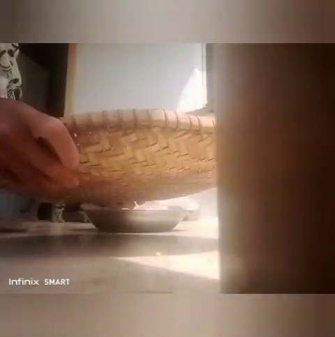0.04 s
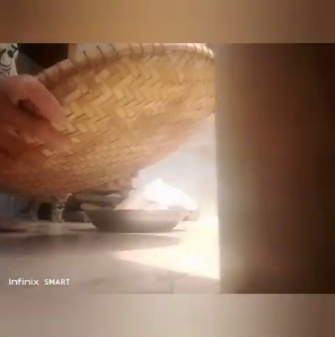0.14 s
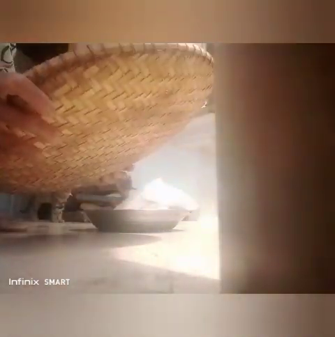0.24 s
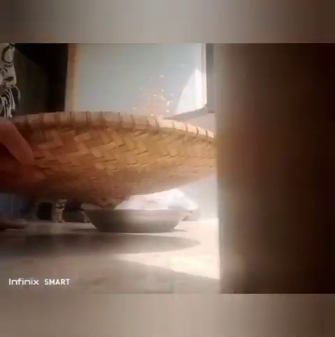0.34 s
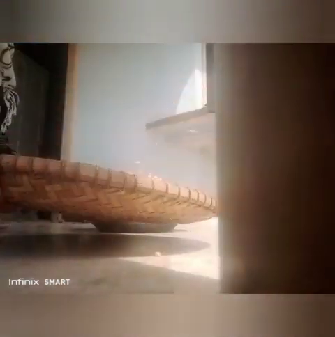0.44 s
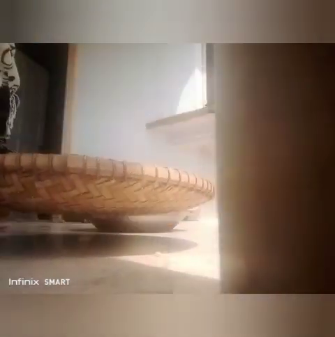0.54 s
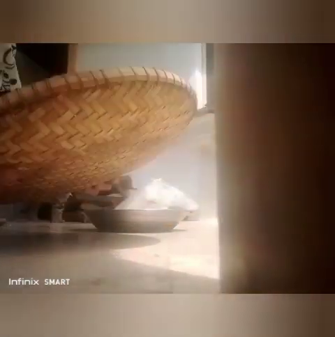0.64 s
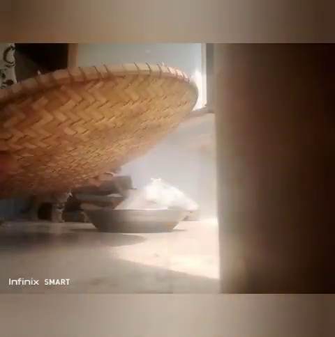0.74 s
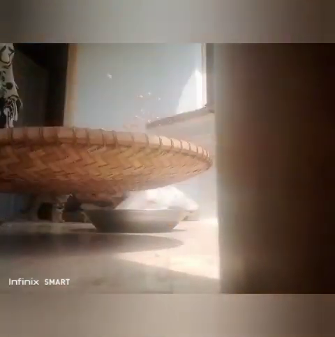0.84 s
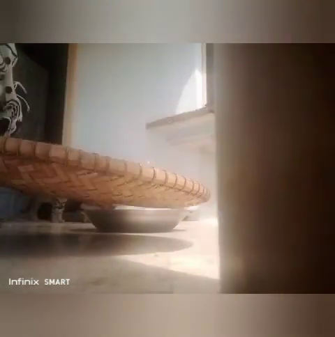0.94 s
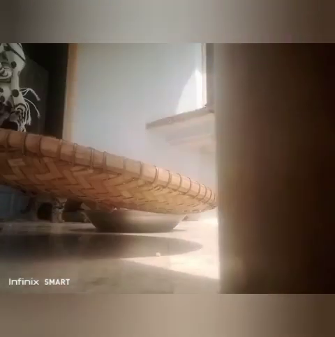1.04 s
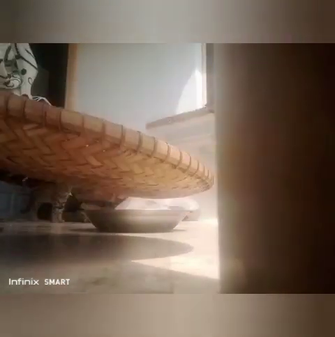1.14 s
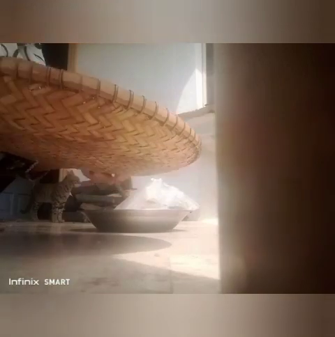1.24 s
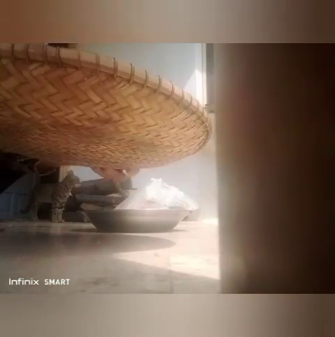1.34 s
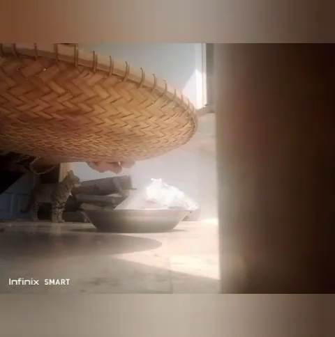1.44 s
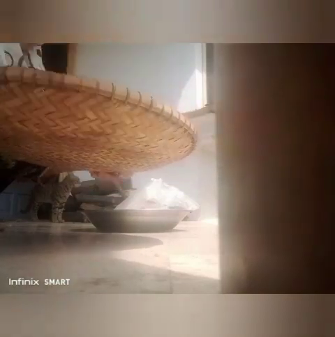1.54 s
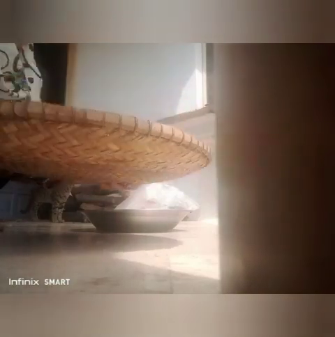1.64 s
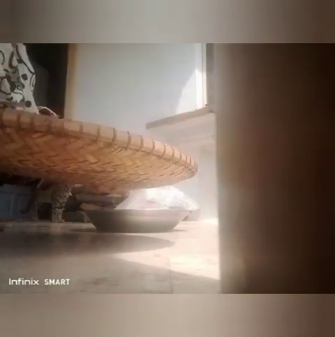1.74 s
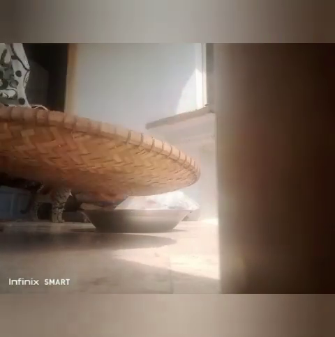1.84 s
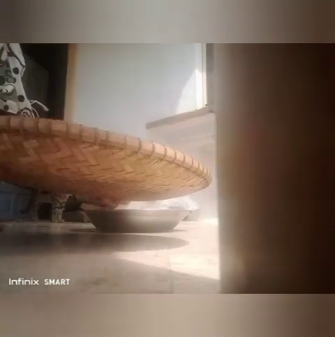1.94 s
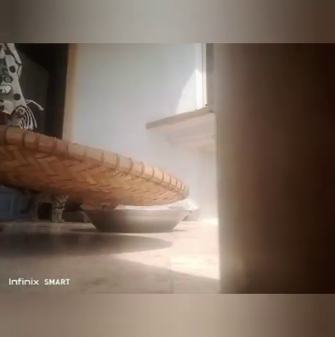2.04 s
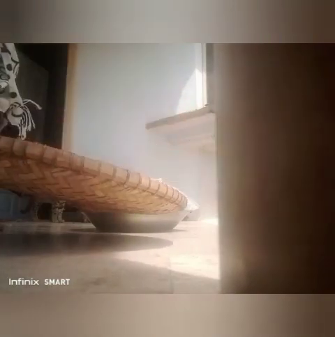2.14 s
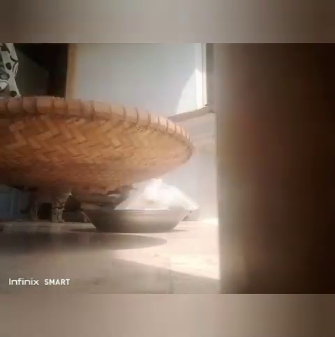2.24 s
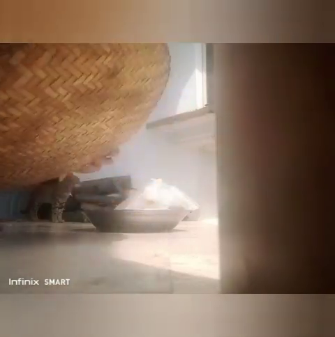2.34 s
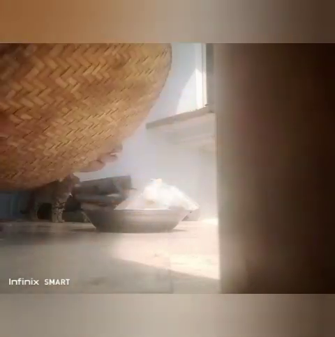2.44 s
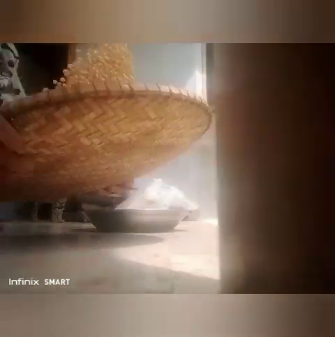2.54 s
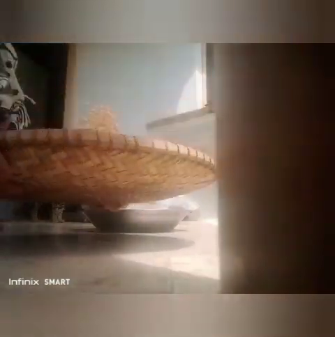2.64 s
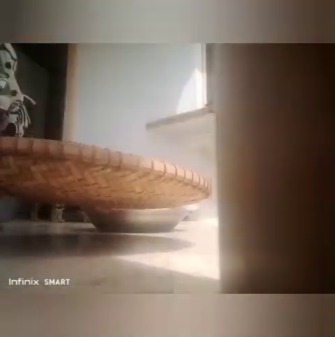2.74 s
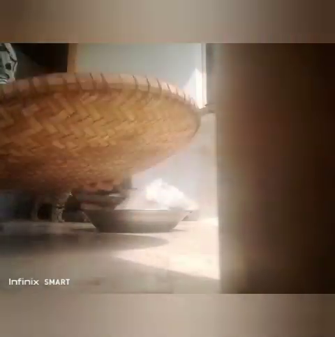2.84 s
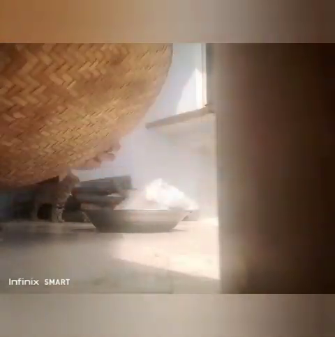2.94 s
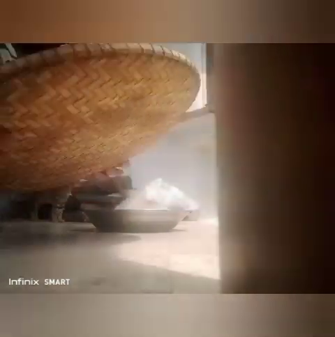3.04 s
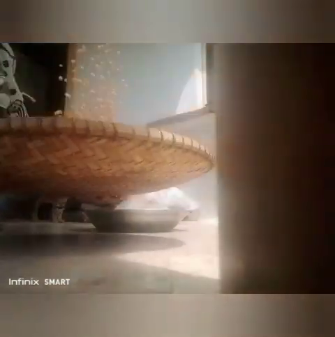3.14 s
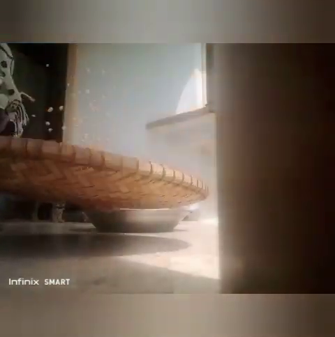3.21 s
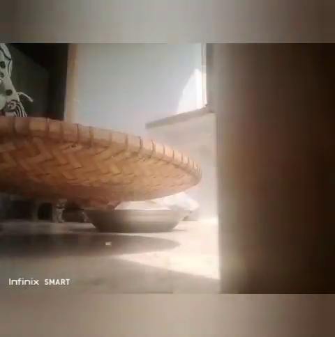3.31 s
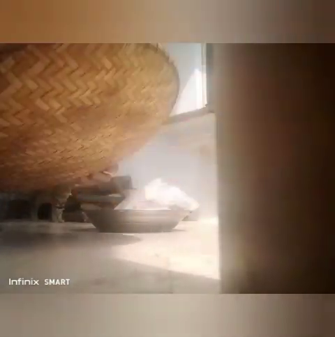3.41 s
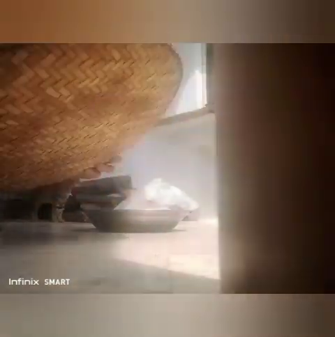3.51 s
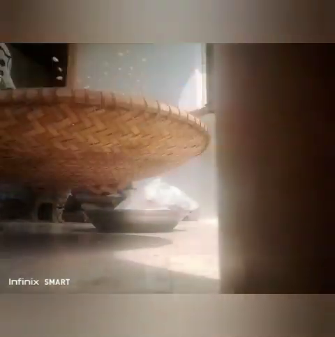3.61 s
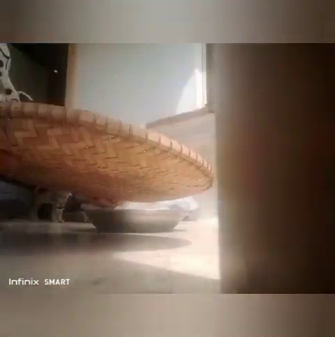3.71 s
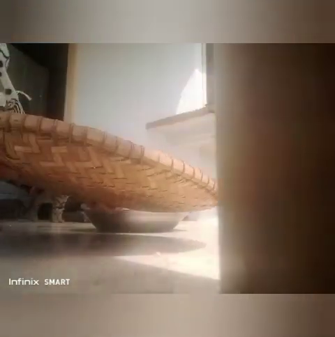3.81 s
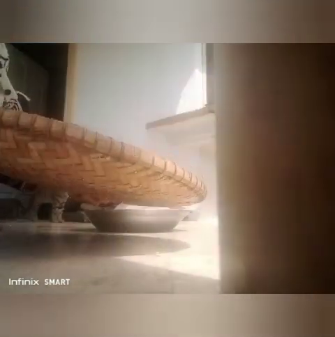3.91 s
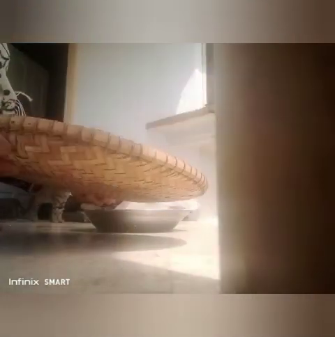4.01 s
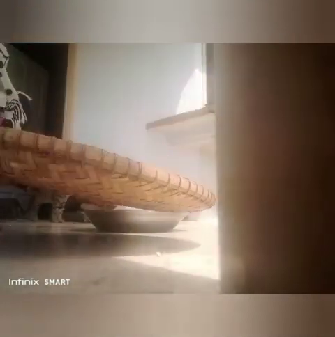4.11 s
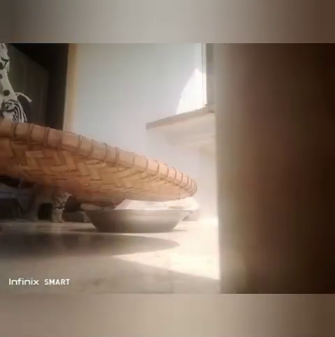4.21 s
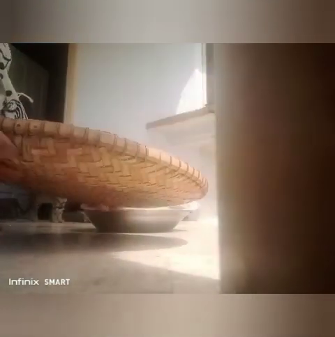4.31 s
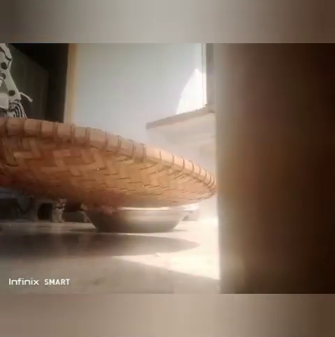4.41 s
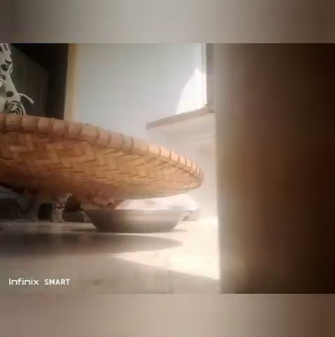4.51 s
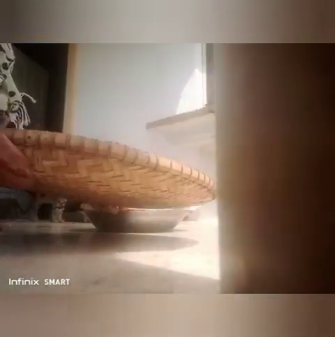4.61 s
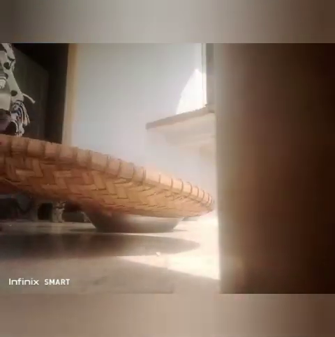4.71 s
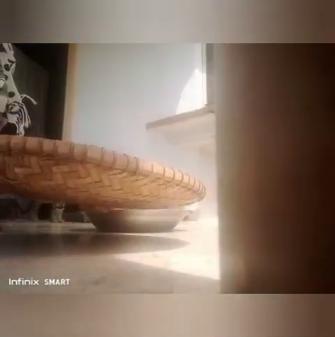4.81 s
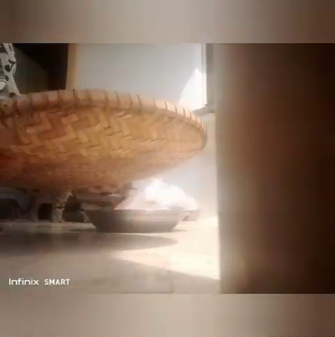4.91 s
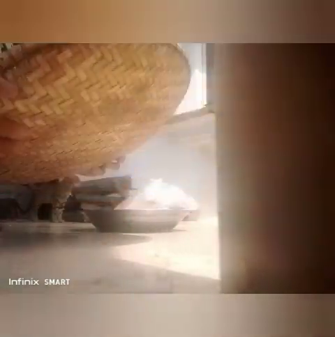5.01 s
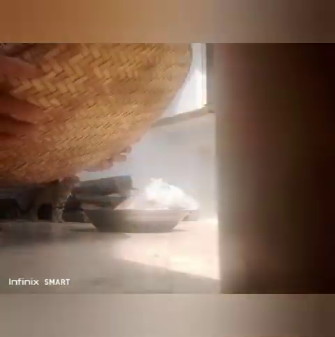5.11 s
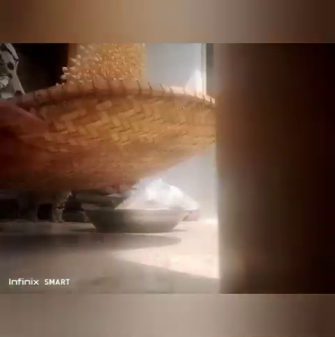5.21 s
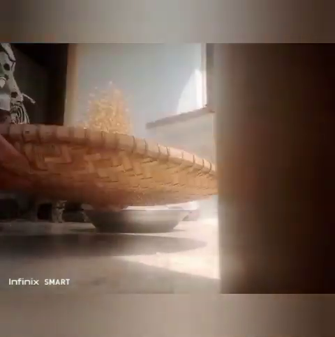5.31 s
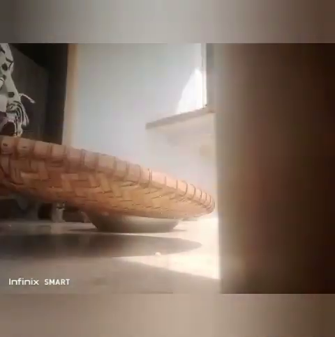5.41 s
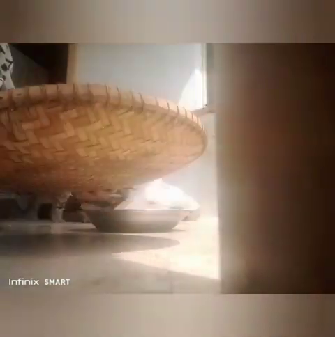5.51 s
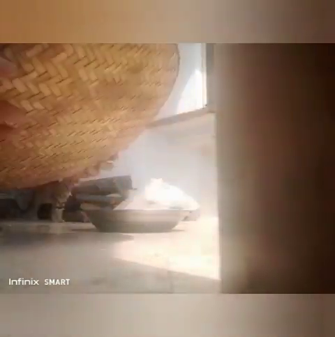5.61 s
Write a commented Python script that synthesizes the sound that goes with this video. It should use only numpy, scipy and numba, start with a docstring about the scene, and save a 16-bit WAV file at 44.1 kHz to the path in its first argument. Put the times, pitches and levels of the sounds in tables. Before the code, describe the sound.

Dried corn kernels are winnowed in a woven bamboo tray very near a phone, for about 5.7 seconds. It opens inside a loud swish, then repeated rushes follow at roughly 0.5, 1.0, 1.3, 1.5 and 1.75 seconds, each swelling and falling like a short burst of hard rain: thousands of crisp ticks and clatter, with softer weave drumming beneath. Around 2.3 to 2.5 the load thins to stray clicks and barely audible bowl pings. A strong swish returns at 2.7, with low air thumps on the microphone near 3.0. Further swishes come at 3.2, 3.3, 3.8, 4.0, 4.2, 4.5 and 4.8, with a heavy low puff near 3.75. After a lull around 5.1, the loudest rush lands at about 5.4, and deep wind pops strike around 5.6. A faint steady floor lies underneath; the sound is dry, close and identical in both channels.

```python
"""On a floor, dried corn kernels slide, rain and settle in a woven bamboo tray that is tossed near a phone.
Each kernel is an impact exciting damped modes; thousands overlap as weave drumming, clatter and ticks.
Lone kernels click as decaying noise bursts, and strays ring the modes of a metal bowl.
Fanned air buffets the microphone as gusts of coloured noise with swinging pressure pops, over a faint floor."""
import sys
import numpy as np
from scipy import signal
from scipy.fft import rfft, irfft, next_fast_len
from scipy.io import wavfile
from scipy.ndimage import uniform_filter1d
from numba import njit

SR = 44100
rng = np.random.default_rng(int(sys.argv[2]) if len(sys.argv) > 2 else 0)


def generate_wav(signal):
    """Clip the signal to [-1, 1] and save it as 16-bit WAV at the path in sys.argv[1]."""
    frames = np.transpose(np.atleast_2d(signal))
    scaled = np.clip(frames, -1, 1) * 32767
    pcm = np.round(scaled).astype(np.int16)
    wavfile.write(sys.argv[1], SR, pcm)


N = 249606
SIZE = next_fast_len(N + 8192)  # transform length, with room for filter tails
HZ = np.arange(SIZE // 2 + 1) * SR / SIZE
T = np.arange(N) / SR

# Spectrum of a knock at the phone: f/Hz, level/dB
KNOCK_COLOUR = [(120, -45), (230, -34), (450, -20), (700, -15.5), (1200, -18), (1800, -4.5), (3500, -3.5),
                (4900, 0), (6300, 0.5), (7100, -7.5), (8000, -17.5)]
# Its continuation, where the microphone port lifts the top: f/Hz, level/dB
PORT_COLOUR = [(13700, -25), (14400, -16), (15000, -10), (15800, -7.5)]
# Borders between weave drumming, clatter, ticks, hard edge and glassy top: f/Hz
PART_EDGES_HZ = [200, 1400, 3600, 7800, 13800, 18000]
# Knocks of each part: rate/(1/s), middle ring t60/s, size scatter/dB, bunching/dB,
# then shares before the mix is normalised: wash/dB, cracks/dB
PART_KNOCKS = [(303.6, 0.15, 1.5, -1.83, -4, -9), (1204, 0.054, 2, 1, -0.5, -6),
               (1926, 0.031, 0.5, 0.91, 0, -11), (1790, 0.032, 3, 1.4, 1.5, -4.5),
               (1200, 0.011, 1, 4, 0.5, -7)]
# Swishes of the load: crest t/s, rise scale/s, fall scale/s, tick level/dB,
# then relative to the ticks: weave level/dB, clatter level/dB, hard edge level/dB, glassy top level/dB
LOAD_SWISHES = [(0.02, 0.18, 0.17, -26.5, -16, -4.5, -21.5, -10), (0.11, 0.09, 0.07, -42, -2, -8, -20, -18),
                (0.441, 0.12, 0.12, -33.5, -25, -5, -17, -4),
                (0.528, 0.16, .13, -28, -13.5, -4, -17.5, -10.5),
                (0.942, 0.085, 0.12, -30.5, -12, -2.5, -14.5, -4),
                (1.039, .08, .1, -35, -7, -2, -21.5, -11), (1.27, .16, 0.21, -30, -13.5, -6.5, -17, -10),
                (1.47, 0.11, 0.15, -26, -13.5, -10, -20.5, -16),
                (1.601, 0.15, 0.17, -28.5, -13, -9.5, -20.5, -16),
                (1.75, 0.14, .15, -32.5, -17, -2.5, -15.5, -10),
                (1.89, .12, 0.21, -40, -18.5, -2, -14, -15),
                (2.06, .13, 0.25, -30.5, -18, -2.5, -16.5, -12),
                (2.69, .12, 0.24, -26.5, -14.5, -4, -15, -2), (2.818, 0.14, 0.15, -28, -14, -5, -31, -20),
                (3.191, 0.11, 0.13, -31.5, -21, -4, -15, -2),
                (3.31, 0.16, 0.19, -27.5, -11, -4.5, -18.5, -4),
                (3.76, .16, 0.23, -32, -10.5, -4, -13.5, -2.5),
                (3.952, 0.18, 0.22, -28, -14, -2.5, -19, -5.5),
                (4.209, .12, 0.37, -28, -14.5, -2.5, -20.5, -7),
                (4.50, 0.13, 0.24, -30, -16, -2, -20.5, -11),
                (4.78, 0.16, 0.16, -30.5, -22.5, -4, -20, -14), (5.331, 0.11, 0.21, -32, -14, -2, -10.5, 1),
                (5.44, 0.18, 0.19, -24, -15.5, -5.5, -18, -7)]
# Envelope of each part: lag behind the crest (negative leads)/s, rising steepness, falling steepness,
# flank exponent (larger is a flatter crest), share of the stragglers/dB
PART_TIMING = [(-0.0065, 1.34, 1.23, 2.49, -17.5), (-0.0076, 1.01, 1.09, 1.96, -2),
               (-0.0031, 1.044, 1.13, 1.81, -1.5), (-0.024, 1.42, 1.065, 1.8, -18),
               (-0.015, 1.43, 1.3, 1.6, -21)]
# Stragglers that roll on between swishes: t/s, level before each part's share/dB
STRAGGLER_LEVELS = [(0.25, -56.5), (0.7, -53), (0.75, -72), (0.8, -57.5), (2.36, -55.5), (2.41, -57.5),
                    (2.45, -52.5), (2.51, -61), (3.0, -52.5), (3.55, -59), (4.98, -51.5), (5.07, -65),
                    (5.12, -56), (5.17, -60.5), (5.66, -68)]
RETUNE_S, MODES_AT_ONCE, CRACKS_PER_S = 0.09, 14, 500
FLANK_DB = 20  # fall from a crest at one rise or fall scale, divided by its steepness

# Lone kernels that drop while the rest are in the air: t/s, level before trim and colour/dB
LONE_DROPS = [(2.3137, -31), (2.3474, -43), (2.359, -42), (2.3764, -44), (2.4874, -38), (2.5466, -41),
              (3.0224, -42), (3.0444, -29), (3.474, -37), (3.528, -39), (5.193, -36)]
# Stray kernels on the metal bowl: t/s, level/dB
BOWL_HITS = [(2.253, -62), (2.288, -57), (2.298, -52.5), (5.018, -53), (5.030, -57)]
# Modes of the bowl: f/Hz, mean level relative to the hit/dB, t60/s
BOWL_MODES = [(7000, -6, 0.12), (7800, -10, .12), (13250, -4, 0.07), (14810, -3, 0.065)]

# Air fanned over the microphone: start t/s, held length/s, level/dB
AIR_GUSTS = [(0.404, 0.036, -71), (1.985, 0.092, -77), (2.13, .03, -68), (2.2, 0.034, -57),
             (2.286, .08, -67), (2.838, 0.19, -42.5), (3.07, 0.042, -48), (3.173, 0.12, -42),
             (3.38, .03, -43), (3.458, 0.12, -40), (3.6, .06, -61), (3.737, 0.054, -26.5),
             (3.868, 0.025, -29), (3.95, 0.089, -50.5), (4.52, .15, -39.5), (4.743, 0.12, -42.5),
             (5.162, .03, -59), (5.2, 0.15, -42), (5.47, 0.027, -55), (5.578, .08, -39.5)]
# Breeze between gusts: t/s, level/dB
BREEZE_LEVELS = [(0.0, -68), (0.1, -94), (0.7, -92), (1.2, -77), (1.9, -85), (2.5, -82), (2.75, -66),
                 (3.6, -60), (4.2, -68.5), (5.0, -85), (5.66, -63)]
# Spectrum of the buffeting, before its power is normalised: f/Hz, level/dB
BUFFET_COLOUR = [(15, -32), (25, -1), (58, 2), (87, 5.5), (144, -0.5), (229, -13.5), (330, -23), (430, -53),
                 (730, -120)]
# Eddies that pop on the port: t/s, level before trim/dB, settled f/Hz
EDDY_POPS = [(0.413, -48, 88.6), (1.98, -51, 83.4), (2.049, -53, 107), (2.212, -40, 103), (2.844, -29, 107),
             (2.921, -24.5, 127), (2.964, -28, 100.6), (3.011, -15.5, 170), (3.029, -21.5, 117),
             (3.267, -33, 78.1), (3.39, -29, 127), (3.496, -29, 88.8), (3.553, -34, 120.1),
             (3.762, -15, 220), (3.772, -28, 110), (3.883, -27, 101), (4.533, -34, 85), (4.754, -26, 131),
             (4.815, -32.5, 94.2), (5.014, -49, 99.6), (5.221, -35, 72.7), (5.303, -34, 120),
             (5.567, -30, 125), (5.605, -28, 100), (5.638, -9.5, 132), (5.651, -12, 165)]
GUST_RISE_DB_S, GUST_FALL_DB_S = 700, 450
POP_CYCLES = 4.57  # cycles at the settled pitch until an eddy is 60 dB down

# Spectrum of the background floor, before its power is normalised: f/Hz, level/dB
FLOOR_COLOUR = [(18, -26), (30, -2), (60, -26), (117, -15), (209, -21.5), (1150, -27), (2040, -7.5),
                (5830, -22), (8420, -28), (15800, -47)]
FLOOR_DB = -66.5
LOW_CUT_HZ, TOP_HZ = 47, 15750


def kernels():
    """Superposition of impacts: modal rings and sharp cracks over the noise of countless fainter knocks."""
    knock = response(KNOCK_COLOUR + PORT_COLOUR)
    shared_bunch = walk(24.98)
    # the hardest cracks fall at the same instants in every part
    crack_here = rng.random(N) < CRACKS_PER_S / SR
    crack_sign = np.sign(rng.standard_normal(N))
    cracks = crack_here * crack_sign * sizes(rng.random(N), 2.3)
    out = np.zeros(N)
    for lo, hi, part, level in zip(PART_EDGES_HZ, PART_EDGES_HZ[1:], PART_KNOCKS, motion()):
        rate, t60, scatter_db, bunch_db, wash_db, crack_db = part
        rings = modal_rings(lo, hi, rate, t60, scatter_db)
        wash = rng.standard_normal(N)
        gain = knock * band(lo, hi)
        mix = np.zeros(N)
        for layer, share_db in ((rings, 0), (wash, wash_db), (cracks, crack_db)):
            mix += undb(share_db) * unit(colour(layer, gain))
        bunching = undb(bunch_db * (0.5 * shared_bunch + 0.58 * walk(40)))
        out += level * bunching * unit(mix)
    return out


def modal_rings(lo, hi, rate, t60, scatter_db):
    """Modal excitation: random impacts ring a few modes that the shifting load keeps retuning."""
    when, which, damp, size = rng.random((4, int(rate * N / SR)))
    periods = N / SR / RETUNE_S
    tuning = rng.random((int(periods) + 2, MODES_AT_ONCE))
    # the damping draw also staggers each knock's retuning
    period = (when * periods + damp).astype(int)
    mode = (which * MODES_AT_ONCE).astype(int)
    low, high = lo * 0.93, hi * 1.07
    hz = low + (high - low) * tuning[period, mode]
    decay = t60 * (0.5 + damp) * SR  # samples to fall 60 dB
    pole = np.exp(2j * np.pi * hz / SR - np.log(1000) / decay)
    start = (when * N).astype(np.int64)
    length = (decay / 2).astype(np.int64)  # each ring stops 30 dB down
    return ring(start, pole, sizes(size, scatter_db), length, N)


@njit
def ring(start, pole, size, length, count):
    """Damped harmonic motion: the imaginary part of a decaying rotation, one for each knock."""
    out = np.zeros(count)
    for k in range(len(start)):
        z = size[k] + 0j
        for i in range(start[k], min(start[k] + length[k], count)):
            out[i] += z.imag
            z *= pole[k]
    return out


def sizes(chance, scatter_db):
    """Exponential statistics of impact level: many small knocks, few large, with an upper limit."""
    return undb(scatter_db * np.minimum(-np.log(chance), 4.0))


def motion():
    """Power addition: swishes with power-law flanks in dB, plus stragglers, set each part's amplitude."""
    columns = np.transpose(LOAD_SWISHES)[:, :, None]
    crest, rise, fall, tick_db, weave_db, clatter_db, edge_db, top_db = columns
    coarse_t = T[::64]
    straggler_db = curve(STRAGGLER_LEVELS)
    levels = []
    for share_db, timing in zip((weave_db, clatter_db, 0, edge_db, top_db), PART_TIMING):
        lag, up, down, flat, lull_db = timing
        away = coarse_t - crest - lag
        slope = np.where(away < 0, up / rise, down / fall)
        db = tick_db + share_db - FLANK_DB * abs(away * slope) ** flat
        swish_power = np.interp(T, coarse_t, np.sum(undb(db) ** 2, axis=0))
        levels.append(np.sqrt(swish_power + undb(straggler_db + lull_db) ** 2))
    return levels


def lone_kernels():
    """Exponential decay: each drop is a noise click with a few ms of rattle."""
    out, t = np.zeros(N), T[:600]
    for s, db in LONE_DROPS:
        rattle = rng.standard_normal(len(t)) * 1000.0 ** (-t / 0.0068)
        add(out, s, undb(db - 2.0) * rattle)
    return colour(out, response(KNOCK_COLOUR + PORT_COLOUR))


def bowl():
    """Modal ringing of thin metal: each hit excites the same damped modes in different strengths."""
    out, t = np.zeros(N), T[:6000]
    for s, db in BOWL_HITS:
        for hz, mode_db, t60 in BOWL_MODES:
            strength = undb(db + mode_db + 5.1 * rng.standard_normal())
            add(out, s, strength * np.sin(2 * np.pi * hz * t) * 1000.0 ** (-t / t60))
    return out


def wind():
    """Turbulent pressure fluctuation: lumpy low noise follows the gusts, and eddies pop on the port."""
    return buffeting() + eddies()


def buffeting():
    """Spectral shaping of turbulence: noise with random lumps is filtered under the gust envelope."""
    lumps = gusts() * unit(undb(2.5 * walk(40)) * rng.standard_normal(N))
    gain = response(BUFFET_COLOUR)
    return colour(lumps, gain / np.sqrt(np.mean(abs(gain) ** 2))) * undb(-2.0)


def eddies():
    """Damped pressure swing: each pop is a brief sine whose pitch falls as the eddy passes."""
    out, t = np.zeros(N), T[:4000]
    for s, db, hz in EDDY_POPS:
        phase = 2 * np.pi * hz * t * (1 + 0.69 * np.exp(-t / 0.006))
        attack = np.sin(np.pi / 2 * np.minimum(t / 0.0046, 1)) ** 2
        decay = 1000.0 ** (-t * hz / POP_CYCLES)
        add(out, s, undb(db + 4.5) * np.sin(phase) * attack * decay)
    return out


def gusts():
    """Envelope of the air: each gust rises, holds and falls linearly in dB over the breeze."""
    level = curve(BREEZE_LEVELS)
    for s, length, db in AIR_GUSTS:
        before = np.maximum(s - T, 0)
        after = np.maximum(T - s - length, 0)
        level = np.maximum(level, db - GUST_RISE_DB_S * before - GUST_FALL_DB_S * after)
    return undb(level)


def background():
    """Stationary noise: a steady, filtered random floor."""
    return undb(FLOOR_DB) * unit(colour(rng.standard_normal(N), response(FLOOR_COLOUR)))


def response(table):
    """Minimum phase: folding the cepstrum of the log gain yields a causal filter."""
    hz, db = np.transpose(table)
    log_gain = np.interp(np.log(HZ + 1), np.log(hz), db) * np.log(10) / 20
    cepstrum = irfft(log_gain, SIZE)
    cepstrum[1:SIZE // 2] *= 2
    cepstrum[SIZE // 2 + 1:] = 0
    return np.exp(rfft(cepstrum))


def band(lo_hz, hi_hz):
    """Power complementarity: smooth band edges whose power adds to about one with a neighbour's."""
    above = 1 / (1 + (lo_hz / (HZ + 1)) ** 30)
    below = 1 / (1 + (HZ / hi_hz) ** 30)
    return np.sqrt(above * below)


def colour(x, gain):
    """Convolution theorem: filter by multiplying the spectrum by a complex gain."""
    return irfft(rfft(x, SIZE) * gain, SIZE)[:N]


def walk(rate):
    """Smoothed random process: levels held 1 / rate s, averaged twice, scaled to unit RMS."""
    hold = int(SR / rate)
    steps = np.repeat(rng.standard_normal(N // hold + 1), hold)
    return unit(uniform_filter1d(uniform_filter1d(steps, hold), hold)[:N])


def curve(table):
    """Linear interpolation of a level in dB over time."""
    s, db = np.transpose(table)
    return np.interp(T, s, db)


def undb(db):
    """Decibel law: level to amplitude ratio."""
    return 10 ** (np.asarray(db) / 20)


def unit(x):
    """Normalisation to unit RMS."""
    return x / np.sqrt(np.mean(x ** 2))


def add(out, s, x):
    """Superposition: mix a short sound in at time s."""
    i = int(s * SR)
    out[i:i + len(x)] += x[:N - i]


def scene():
    """Superposition of kernels, bowl, wind and floor, alike in both channels."""
    mono = kernels() + lone_kernels() + bowl() + wind() + background()
    return np.array([mono, mono])


def record(dry):
    """Band limitation: the microphone drops the deep bass and the top is cut steeply."""
    high_pass = signal.butter(3, LOW_CUT_HZ, "high", fs=SR, output="sos")
    low_pass = signal.ellip(14, 0.2, 80, TOP_HZ, fs=SR, output="sos")
    return signal.sosfilt(low_pass, signal.sosfilt(high_pass, dry))


dry = scene()
out = record(dry)
generate_wav(out)
```